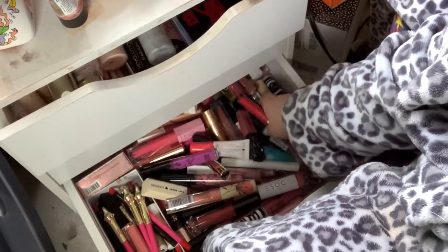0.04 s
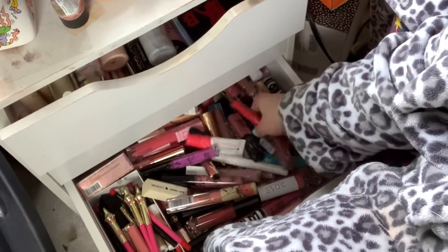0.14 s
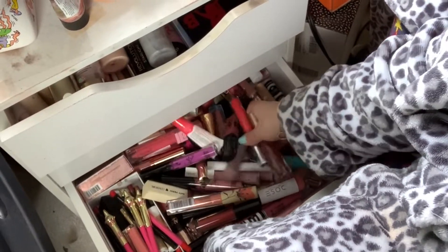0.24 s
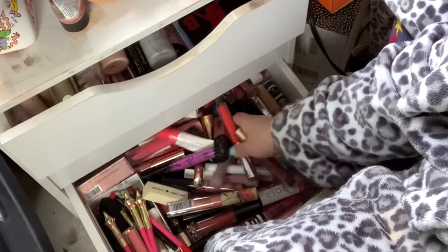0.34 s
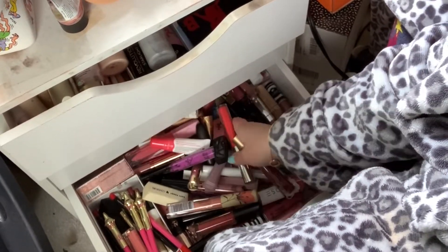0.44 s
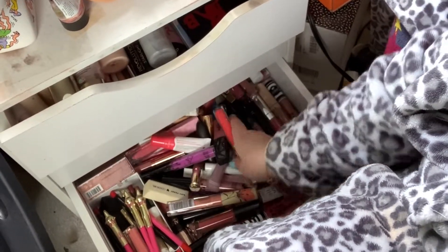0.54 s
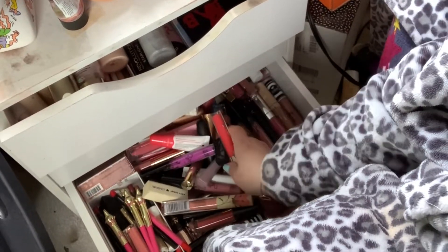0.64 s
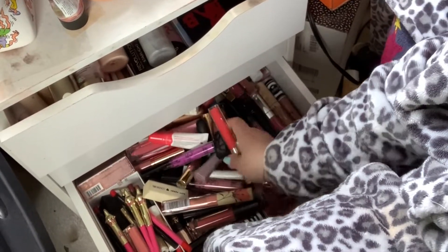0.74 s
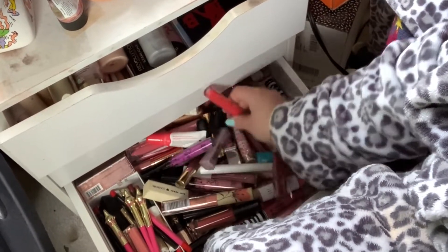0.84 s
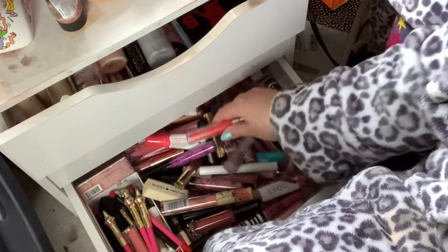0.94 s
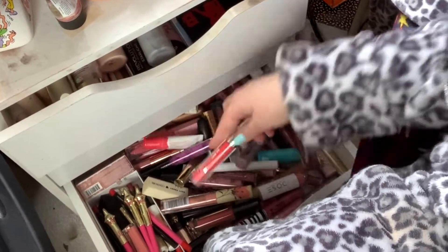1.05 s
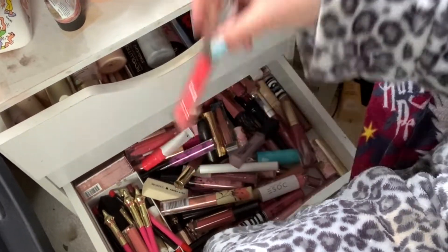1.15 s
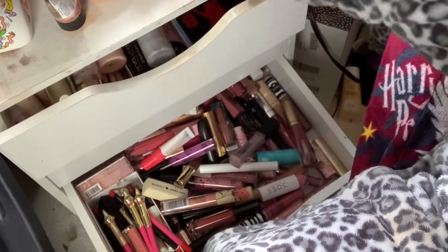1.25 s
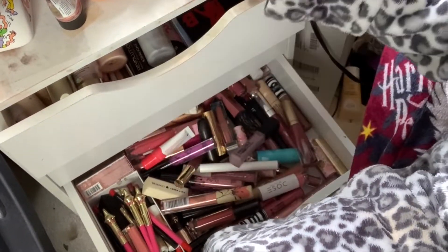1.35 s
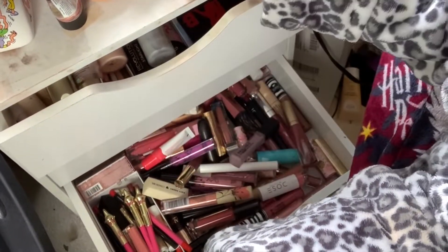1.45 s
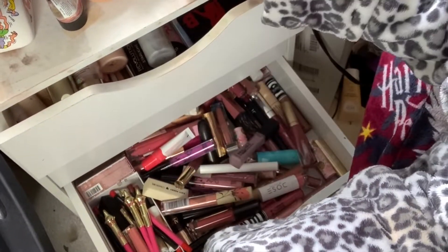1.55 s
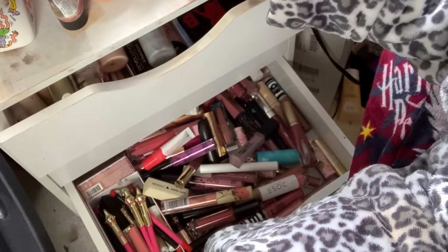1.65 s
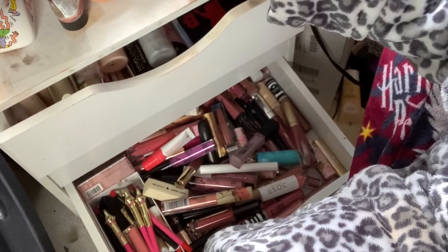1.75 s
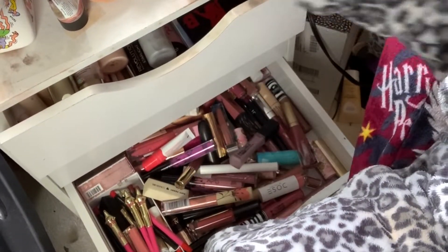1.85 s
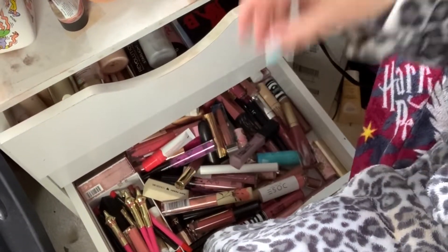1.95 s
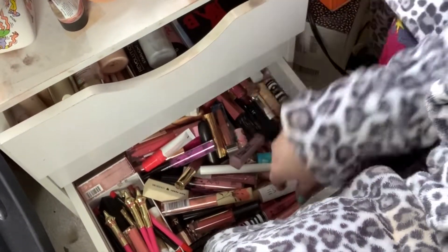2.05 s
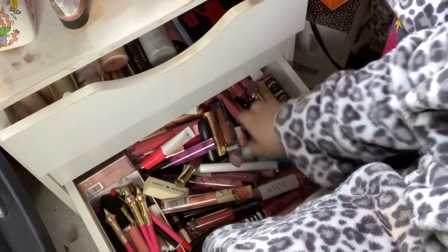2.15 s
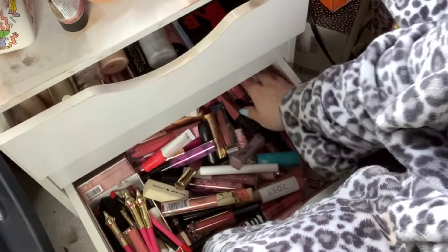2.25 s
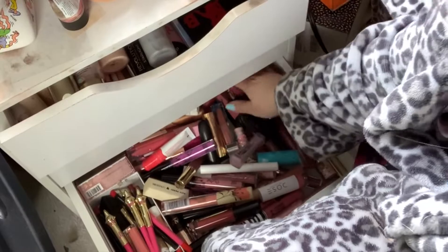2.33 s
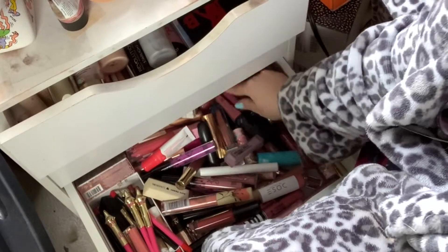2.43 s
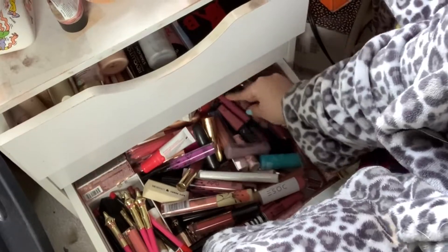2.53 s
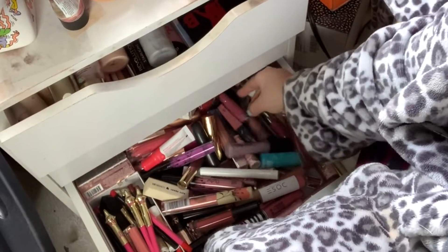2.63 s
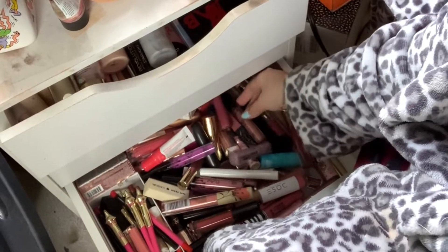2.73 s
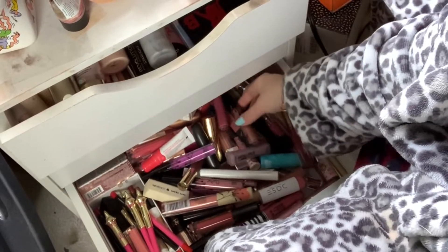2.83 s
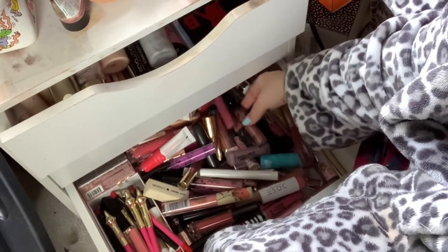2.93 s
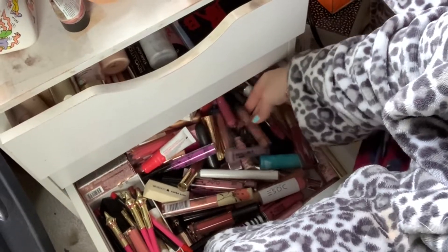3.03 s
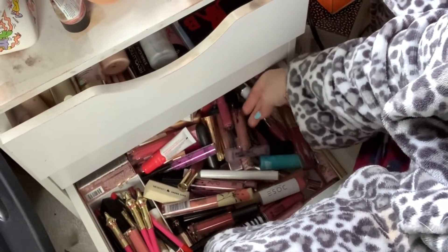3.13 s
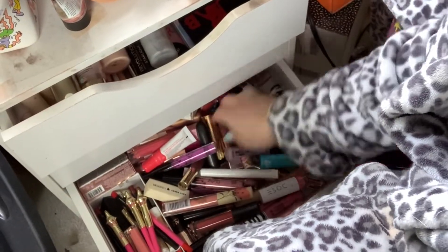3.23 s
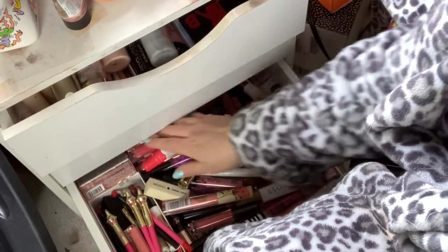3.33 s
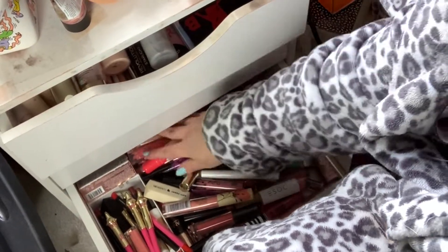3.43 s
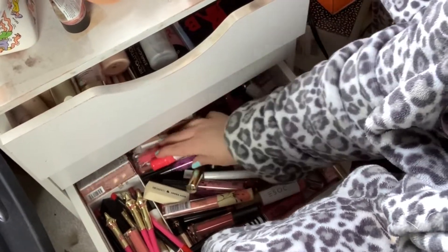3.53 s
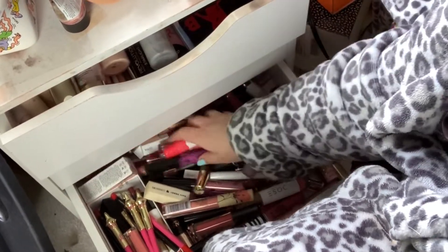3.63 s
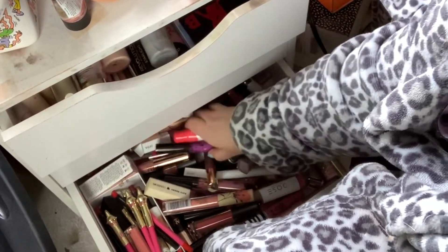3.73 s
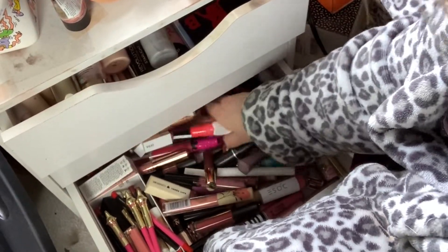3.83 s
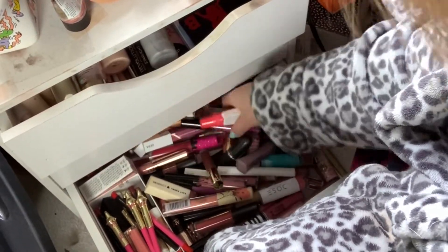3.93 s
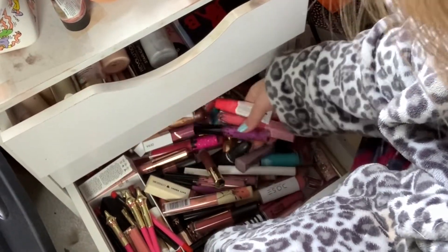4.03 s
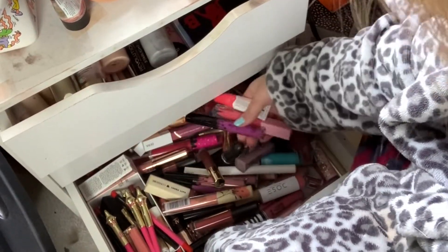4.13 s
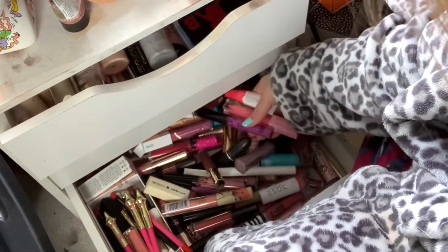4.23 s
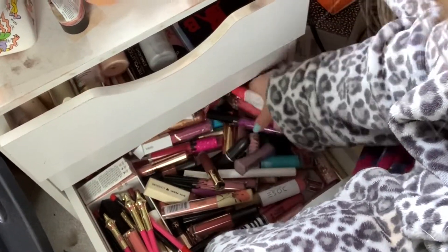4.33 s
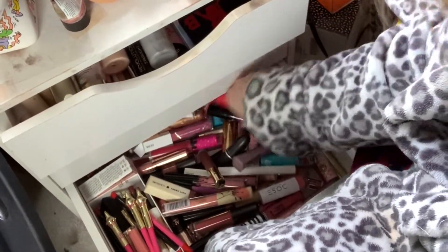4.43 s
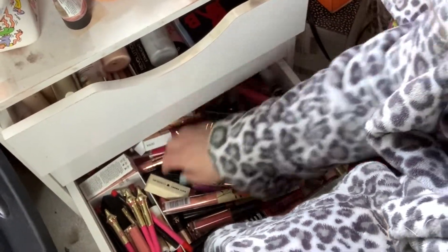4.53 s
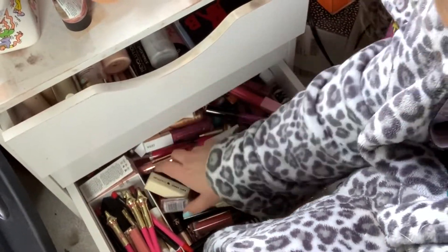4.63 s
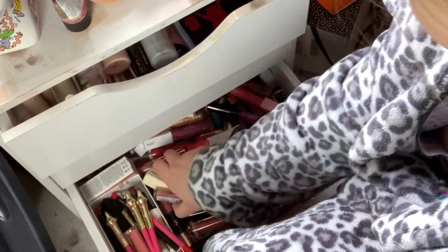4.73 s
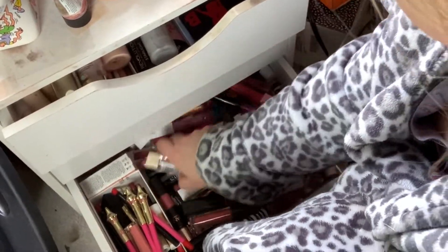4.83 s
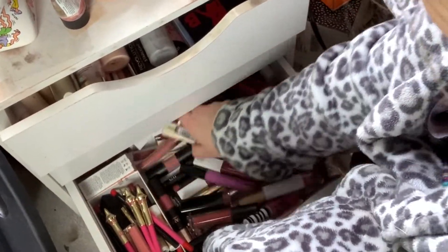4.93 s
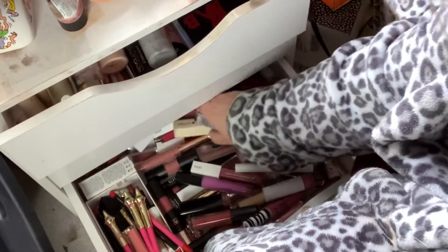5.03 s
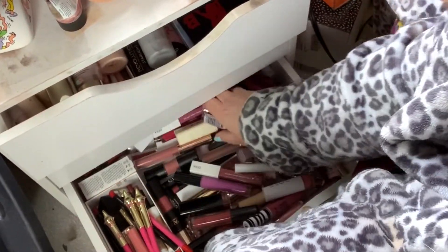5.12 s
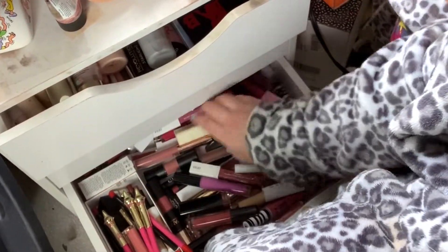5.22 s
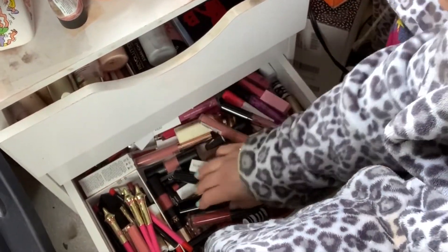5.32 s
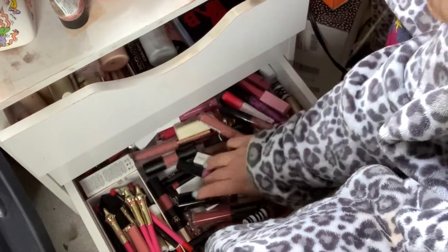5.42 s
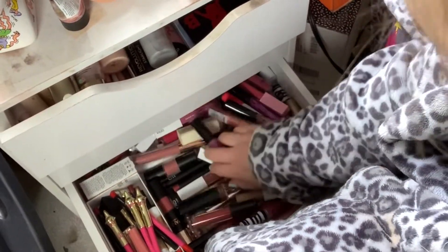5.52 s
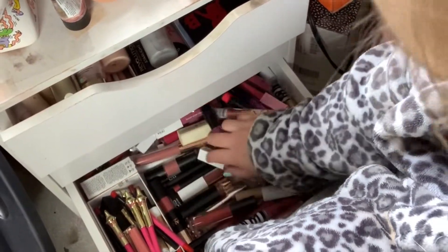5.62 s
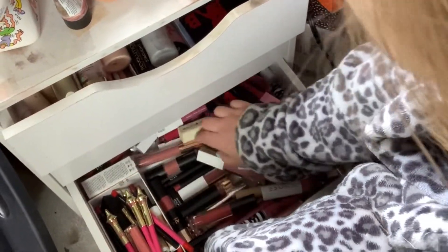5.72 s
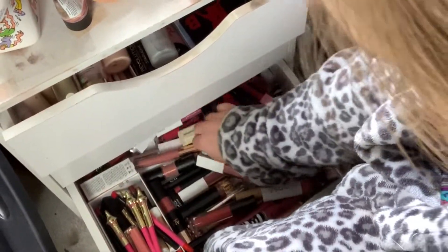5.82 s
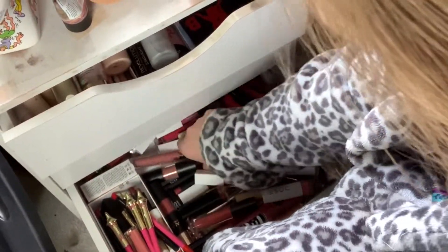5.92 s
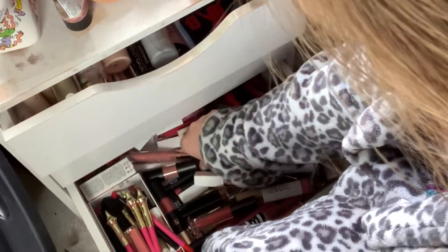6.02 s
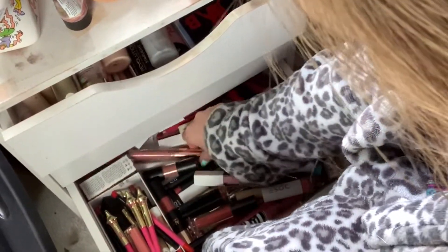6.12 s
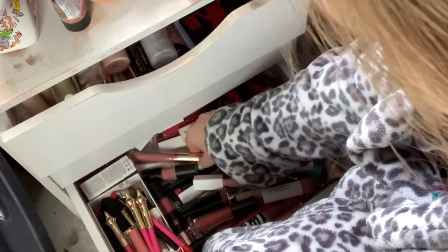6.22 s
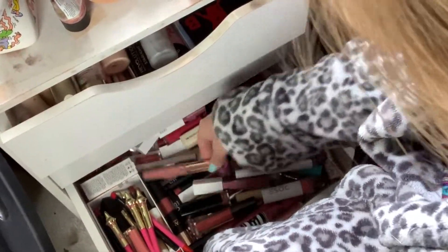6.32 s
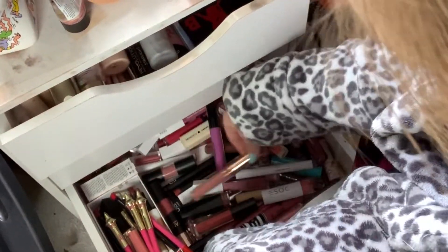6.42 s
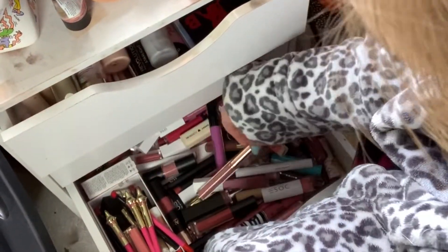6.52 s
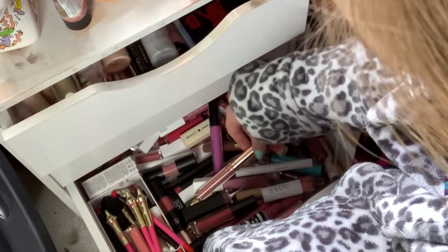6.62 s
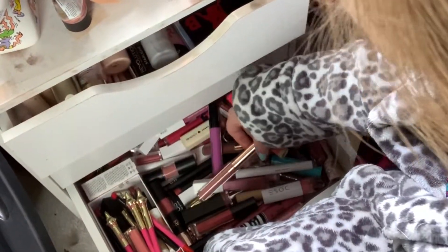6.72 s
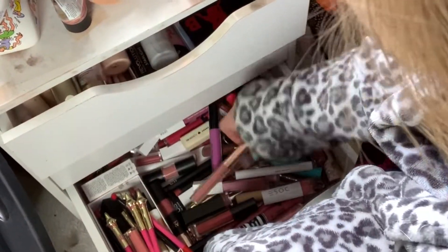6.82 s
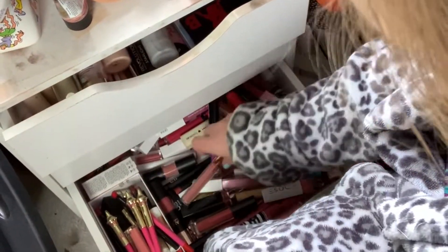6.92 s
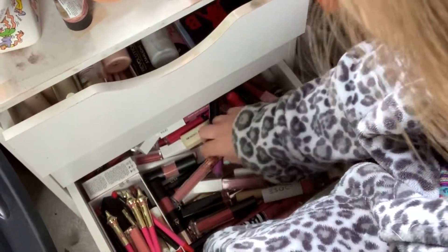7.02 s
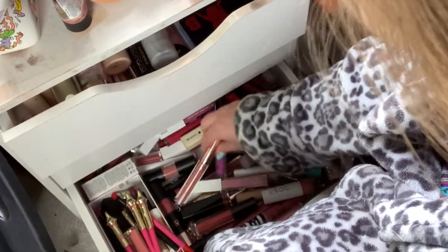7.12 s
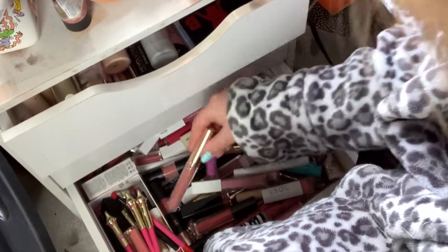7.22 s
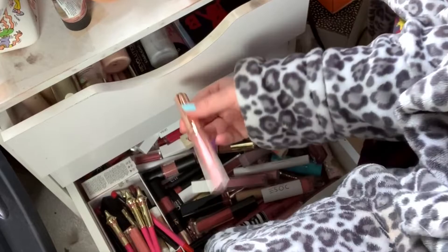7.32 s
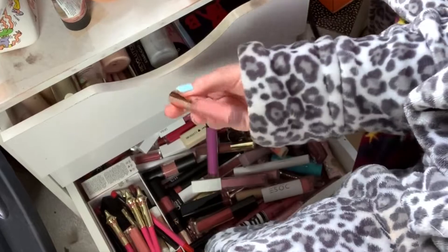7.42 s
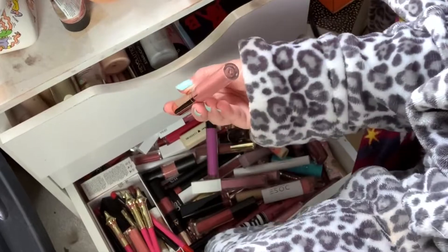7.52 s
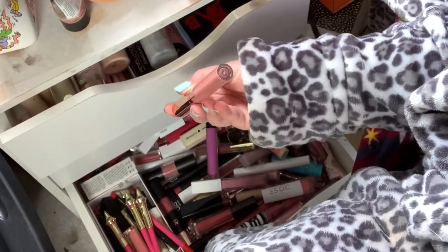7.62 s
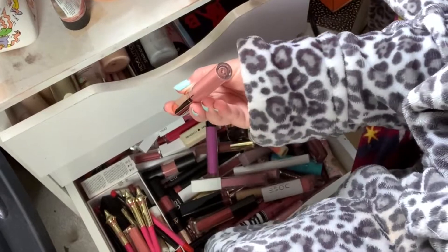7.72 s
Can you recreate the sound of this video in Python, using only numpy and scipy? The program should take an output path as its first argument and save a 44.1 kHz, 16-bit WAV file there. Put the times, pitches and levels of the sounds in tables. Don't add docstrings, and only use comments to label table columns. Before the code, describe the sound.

Many light plastic tubes and caps knock together in a shallow drawer, with bright ticks, short rings and a boxy wooden resonance. The rummaging rushes, pauses after about a second, restarts, and grows densest in the middle. A tiny faint squeak and soft fleece sleeve brushes are barely noticeable. Close stereo pickup, short indoor reflections, quiet room tone with low drawer rumble.

```python
import sys
import numpy as np
from scipy import signal
from scipy.fft import rfft, irfft, next_fast_len
from scipy.io import wavfile
from scipy.ndimage import uniform_filter1d, map_coordinates

SR = 44100
rng = np.random.default_rng(int(sys.argv[2]) if len(sys.argv) > 2 else 0)


def boost(x):
    u = np.asarray(x, float) / 20
    return 10 ** u


def dump(signal):
    limited = np.clip(np.atleast_2d(signal).T, -1, 1)
    pcm = np.round(limited * 32767).astype(np.int16)
    wavfile.write(sys.argv[1], SR, pcm)


N = 342216

# (time [s], shuffle level [dB], frame rumble level [dB])
STIR = [(0.0, -49.5, -70), (0.65, -70.5, -79), (0.99, -33, -67), (1.25, -100.5, -85), (2.27, -65.5, -76.5),
        (2.57, -43.5, -63.5), (2.77, -58, -59), (3.48, -60.5, -86), (3.72, -45, -72), (4.15, -67, -81),
        (4.3, -57.5, -63.5), (4.93, -53, -77.5), (5.79, -50.5, -74), (6.58, -64.5, -84.5),
        (6.72, -59.5, -78), (6.79, -86, -88.5), (7.05, -57, -77), (7.76, -106, -93)]
# (frequency [Hz], width [Hz], level [dB])
HOLLOW = [(1158, 120, -11), (1337, 130, -0.5), (1518, 190, -7.5), (1740, 300, -8.5)]
# (frequency [Hz], likeness [0-1])
ALIKE = [(60, 0.39), (150, 0.91), (700, 0.81), (1400, 1), (15000, 1)]


def unit(x):
    return x / np.sqrt(np.mean(x ** 2, -1, keepdims=True) + 1e-20)


def along(points, hz):
    f, v = np.transpose(points)
    return np.interp(np.log(hz + 1), np.log(f + 1), v)


def curves(rows):
    s, *cols = np.transpose(rows)
    return [np.interp(np.arange(N) / SR, s, c) for c in cols]


def wobble(rate):
    knots = rng.standard_normal(int(N * rate / SR) + 4)
    return map_coordinates(knots, [np.arange(N) * rate / SR])


def causal(gain):
    c = irfft(np.log(gain + 1e-6))
    half = len(c) // 2 - 1
    fold = np.r_[1, np.full(half, 2.), 1, np.zeros(half)]
    return np.exp(rfft(c * fold))


def mode(f, hz, width):
    return 1j * f * width / (hz * hz - f * f + 1j * f * width + 1e-9)


def body(modes, f, count, detune, scatter_db):
    draw = rng.standard_normal((count, len(modes), 2))
    total = 0
    for k, (hz, width, db) in enumerate(modes):
        gain = (-1) ** k * boost(db + scatter_db * draw[:, k, :1])
        total = total + gain * mode(f, hz * (1 + detune * draw[:, k, 1:]), width)
    return total


def peak_one(z):
    return z / np.abs(irfft(z)).max(-1, keepdims=True)


def spread(a, b, f, alike):
    u = np.arccos(np.clip(along(alike, f), -1, 1)) / 2
    shared, differing = np.cos(u) * a, np.sin(u) * b
    return np.array([shared + differing, shared - differing])


def tails(decay, count, size):
    hz, t, z = signal.stft(rng.standard_normal((count, size)), SR, nperseg=256)
    fade = boost(-60 * t / along(decay, hz)[:, None])
    x = signal.istft(z * fade, SR, nperseg=256)[1][:, :size]
    return x / np.linalg.norm(x, axis=1, keepdims=True)


def hiss(spectrum):
    m = next_fast_len(N)
    f = np.fft.rfftfreq(m, 1 / SR)
    a, b = rfft(rng.standard_normal((2, m))) * boost(along(spectrum, f))
    return unit(irfft(spread(a, b, f, ALIKE), m)[:, :N])


def background():
    # (frequency [Hz], density [dB per Hz])
    air = [(25, -62.5), (105, -5.5), (161, -13.5), (240, -15), (980, -21.5), (1300, -32.5), (9000, -40.5),
           (13000, -39), (16500, -55)]
    # (frequency [Hz], density [dB per Hz])
    frame = [(25, -42.5), (95, 7), (170, -9), (300, -69)]
    hum_hz, hum_db, air_db = 445, -90, -76
    rumble = boost(curves(STIR)[1] + 2.1 * wobble(9.5)) * hiss(frame)
    hum = boost(hum_db + 3.8 * wobble(14)) * np.sin(2 * np.pi * hum_hz * np.arange(N) / SR)
    return hum + rumble + boost(air_db + 0.75 * wobble(5.3)) * hiss(air)


def sleeve():
    # (middle [s], half length [s], level [dB], centre [Hz])
    swishes = [
        (0, 0.025, -61.5, 1500),
        (2.003, 0.31, -74, 520),
        (3.393, 0.087, -69, 6510),
        (7.7, 0.0793, -92, 2200),
    ]
    t = np.arange(N) / SR
    total = 0
    for s, half_s, db, hz in swishes:
        swell_db = db - 4.9 * ((t - s) / half_s) ** 4 + 2.5 * wobble(40)
        cloth = hiss([(hz / 3, -20), (hz / 1.7, 0), (hz * 1.6, -2), (hz * 2.6, -45)])
        total = total + boost(swell_db) * cloth
    return total


def clacks(rows, rattle_s, wall_db, size, own=None):
    # (frequency [Hz], width [Hz], level [dB])
    box = [(517.2, 80, -10), (699.7, 97.3, 1), (912.6, 150, -8)]
    # (frequency [Hz], width [Hz], level [dB])
    shell_modes = [(2410, 540, 0), (2840, 250, 1), (3360, 160, 0), (4134, 1650, -2), (4640, 580, -12)]
    # (frequency [Hz], width [Hz], level [dB])
    panel_modes = [(245, 32, -2), (350, 30, -8.5)]
    # (frequency [Hz], width [Hz], level [dB])
    cap = [(4200, 300, 0), (5500, 350, 0), (7000, 450, -2), (8800, 550, -4), (11000, 700, -4)]
    # (frequency [Hz], level [dB])
    edge = [(3000, -26.5), (5500, -1.5), (8000, -1.5), (13000, -7), (14500, -11.5), (16000, -14.5),
            (17000, -57.5)]
    # (frequency [Hz], likeness [0-1])
    apart = [(100, 0.99), (800, 0.99), (1150, 0), (2500, 0.3), (6000, 0.5), (12000, 0.2)]
    # (frequency [Hz], t60 [s])
    walls = [(200, 0.26), (700, 0.093), (2000, 0.12), (4000, 0.13), (9000, 0.13)]
    s, db, boom_db, shell_db, tick_db = np.transpose(rows)[:, :, None]
    f, t, n = np.fft.rfftfreq(size, 1 / SR), np.arange(512) / SR, len(rows)

    touch = 200
    late = t - touch / SR
    lead_swell = t * SR / touch * boost(-5 + 60 * late / 0.025)
    swell = np.where(late > 0, boost(-60 * late / rattle_s), lead_swell)
    push = np.exp(-2j * np.pi * f * touch / SR)
    chatter = rfft(rng.standard_normal((n, 512)) ** 3 * swell, size)

    no_bass = mode(f, 470, 3300) ** 2
    if own:
        hollow = own(f, n)
    else:
        hollow = body(HOLLOW, f, n, detune=0.042, scatter_db=4.5) * no_bass
    boom = body(box, f, n, detune=0.018, scatter_db=5.5) * no_bass
    shell = body(shell_modes, f, n, detune=0.068, scatter_db=2.5) * mode(f, 2700, 3800)
    tick = causal(boost(along(edge, f))) * (1.1 + body(cap, f, n, detune=0.15, scatter_db=4))
    hollow = boost(db) * peak_one(hollow * (push + 0.0087 * chatter))
    boom = boost(db + boom_db) * peak_one(boom * (push + 0.0098 * chatter))
    shell = boost(db + shell_db) * peak_one(shell * (push + 0.051 * chatter))
    tick = boost(db + tick_db - 0.7) * peak_one(tick * (push + 0.068 * chatter))
    tube = hollow + shell + tick

    panel = sum(boost(g) * mode(f, hz, width) for hz, width, g in panel_modes)
    panel = panel * mode(f, 310, 430) + boost(-25.0) * mode(f, 120, 92)
    thump = boost(0.7 * (db + boom_db) - 28.5) * peak_one(panel)

    edge_wave = rng.standard_normal((n, 128)) * boost(-60 * t[:128] / .002)
    near = spread(0.73, .6j * unit(rfft(edge_wave, size).real), f, apart)

    pool = rfft(np.pad(tails(walls, count=40, size=size - 900), ((0, 0), (170, 0))), size)
    a, b = pool[rng.integers(0, len(pool), (n, 2)).T]
    blurred = np.sqrt(uniform_filter1d(np.abs(tube) ** 2, size // 75))
    scattered = (blurred + boost(-4.5) * boom + thump) * spread(a, b, f, ALIKE)
    waves = irfft((tube + boom + thump) * near + boost(wall_db) * scattered, size)

    lead_in = 256
    waves = np.roll(waves, lead_in, axis=2)
    at = (np.round(s * SR).astype(int) - lead_in - touch + np.arange(size)).clip(0).ravel()
    return np.array([np.bincount(at, w.ravel(), N + size)[:N] for w in waves])


def contacts():
    # (time [s], hollow peak [dB], boom [dB], shell [dB], tick [dB])
    rummage = [(0.0238, -49, 7, 4, -19), (0.0579, -38.5, -6.5, 2.5, -8), (0.0667, -42.5, 0, 6, 6.5),
               (0.1128, -22, -13, -1, -16.5), (0.2016, -47, 9.5, 4, 1.5), (0.2207, -35, -5, -3, -18.5),
               (0.2554, -30, 1, -5.5, -9.5), (0.2838, -52, 2, 0.5, -6.5), (0.3057, -35, -5, -5, -5),
               (0.3137, -17.5, -1, -0.5, -7), (0.3611, -38, -8, 8, -11), (0.3911, -32.5, -2, 2, -2.5),
               (0.4003, -34.5, 4.5, 2.5, -3.5), (0.4245, -30.5, -24.5, -2, -30),
               (0.4384, -36.5, -4, -2.5, -20.5), (0.5136, -47.5, -2.5, 1.5, -24),
               (0.5703, -44, -4, -10, -21.5), (0.5786, -50.5, -2.5, 8, -1), (0.5986, -25, -15, 3.5, -12.5),
               (0.6237, -32.5, -11.5, -1, -2.5), (0.6342, -31, -12.5, -3, 16.5), (0.712, -36.5, -8.5, 2, -6),
               (0.7355, -37.5, -1, 1, -13), (0.7415, -38.5, -2.5, 5.5, 5.5), (0.7874, -41, -10.5, -5, -19),
               (0.8023, -33, -6.5, 4.5, -15), (0.8349, -36, 5, 5, -4.5), (0.8422, -25.5, -1.5, -1.5, -15.5),
               (0.8958, -33.5, -2.5, 0.5, -14), (0.9037, -26, 9, 4, -14), (0.9216, -18, 0, -3, -16.5),
               (0.9352, -21, -15, -4.5, -16.5), (0.9508, -22, -3.5, -2.5, -12.5),
               (0.9653, -25.5, 5.5, 0.5, -14), (0.988, -27.5, 2, 2.5, -14),
               (1.0225, -16.5, -1.5, -0.5, -16.5),
               (1.0534, -26, -5, 0.5, -14), (1.0813, -25, -7, -4, -10.5), (1.1386, -35, -3, -10.5, -27),
                  (1.1715, -45.5, 9, 2.5, -1), (1.1867, -46, 6, -2.5, -2), (2.268, -54, 12, -3, -29),
                  (2.4135, -30.5, -2, -5, -14.5), (2.4309, -40.5, 8, 4, -11),
                  (2.4579, -21, -12, -4.5, -19.5), (2.4716, -25.5, 1, 3, -3.5),
                  (2.4949, -24.5, -11, -1, -17), (2.5065, -24.5, -5.5, 0, -5), (2.5466, -34, 1, -2, -1),
                  (2.5535, -21, -1, -7.5, -24.5), (2.5929, -37.5, -18, 3.5, -13.5),
                  (2.6144, -40, 1, -6.5, -3), (2.6249, -32.5, -2, -3, -12), (2.6721, -23, -11, -3.5, -9.5),
                  (2.6792, -31, -6, -5.5, -11.5), (2.685, -27.5, -4, 4, 0.5), (2.6939, -25, 4, -6, -21),
                  (2.7151, -35, 2, 4.5, -5), (2.7215, -34.5, 8.5, -3, -21.5), (2.7681, -19, 3, -2, -10),
                  (2.8496, -38, -9, -1, -30), (2.8681, -37, -7, -14.5, -19), (2.9325, -47, 4, 5.5, -10),
                  (2.9604, -37.5, -5, -4.5, -27.5), (3.0087, -37.5, 4.5, -4.5, -35),
                  (3.0253, -37.5, -18, 1, -17), (3.033, -31, 1, 6, -2), (3.0845, -31, 9.5, 7, -5.5),
                  (3.1281, -27.5, 7, 1, -16.5), (3.1896, -40, 3, -0.5, -13.5),
                  (3.2549, -13.5, -5.5, 0, -10),
               (3.5211, -40, 0.5, 6.5, -5.5), (3.538, -33, -5.5, -1, 1), (3.5745, -36.5, 4, 4, -2.5),
           (3.6226, -20, 10.5, 2, 10), (3.6365, -30.5, -2.5, 0.5, 8.5), (3.641, -23, 0, 0.5, -4),
           (3.6536, -28.5, 5, 4.5, -5), (3.6776, -35.5, -7, 6, -5.5), (3.7104, -39, -7.5, 10, -5),
           (3.734, -20, -1.5, 4.5, -14), (3.7914, -38, 3.5, 7, -3.5), (3.8139, -28, -9, -7, -18),
           (3.8233, -43.5, 3, 7, 8), (3.857, -26.5, 6, 0.5, 0), (3.8678, -20, -1.5, -5.5, -16.5),
           (3.885, -27, 4.5, 3.5, -6.5), (3.9806, -19, -5.5, 0.5, -11), (4.0377, -57.5, 0, 11.5, 14.5),
           (4.0502, -46, 8.5, 12, 3), (4.1339, -47, -12, 6.5, -1), (4.2537, -38.5, -5, -4.5, -26),
           (4.2933, -40.5, -14.5, 1, -25.5), (4.3151, -33, -4, 1, 2.5), (4.3432, -33, -11, -1.5, -10),
           (4.3695, -17.5, 0, 0.5, -14.5), (4.3831, -22, -3, -0.5, -13.5), (4.493, -20.5, 7, 4, -9),
           (4.5413, -31.5, 10.5, 1, 5), (4.5739, -26, 1.5, 1.5, -0.5), (4.6, -22.5, -1, -2.5, 0),
           (4.618, -30, 3.5, 6.5, -3), (4.6506, -31, -3, -2, -7),
               (4.7788, -25, -15, -5, -7.5), (4.8295, -31.5, -18, -4, -11), (4.839, -26, -6, -9.5, -22),
            (4.868, -29.5, 0.5, 2, -5.5), (4.8787, -31, 5, 4.5, -5.5), (4.8866, -20.5, -11, -5, -11.5),
            (4.9003, -23.5, 1, -2.5, -3.5), (4.9075, -20, -2, -1, -5), (4.9404, -22, 0, -3.5, -13.5),
            (4.9691, -26.5, -12.5, -1.5, -6), (4.9984, -24.5, -3.5, 0, -2),
            (5.0457, -25.5, -3, -4.5, -10.5), (5.077, -17, 2, -5, -15.5), (5.0987, -27, -9, -3, 1),
            (5.1443, -30, 12, 12.5, 9.5), (5.2028, -18.5, -12.5, -4.5, -23), (5.2562, -37.5, -2.5, -2, -18),
            (5.3, -32, 0, -3.5, -14.5), (5.33, -50.5, -11, -2, -2.5), (5.3511, -29.5, -6, -1, -4.5),
            (5.3589, -36, -7, 7, -6.5), (5.3701, -39, -11, 3.5, -3.5), (5.3848, -29.5, -9.5, 0.5, -7.5),
            (5.4248, -28.5, -2, 4, -1), (5.4802, -34, -1, -2, -3.5), (5.4964, -28.5, -4.5, -3, -9.5),
            (5.5306, -20, 7.5, 4.5, -3.5), (5.545, -19, 4, 1.5, 1), (5.5931, -45, 6.5, 8.5, 14),
            (5.6071, -50, 11.5, 13, 16.5), (5.6142, -37, 6, 9, 1.5), (5.6348, -29.5, 1, 3.5, -8),
            (5.687, -42.5, 0.5, -12, -34), (5.7108, -24.5, 1.5, 1, -19.5), (5.7379, -31, 1, -7.5, -7.5),
               (5.7527, -32.5, 3, 2, -6), (5.788, -30, -3, -4, -9), (5.8185, -46, 8.5, 13, 6),
            (5.8371, -35, -3.5, -2.5, -22), (5.844, -40, -1, 7, 2.5), (5.8647, -27, -5.5, -0.5, -5.5),
            (5.8717, -35, -6, 4.5, 10), (5.8832, -30, -17, -9.5, -13), (5.9006, -31, 0, 2.5, 0),
            (6.0289, -36, -6, -8, -21), (6.0345, -32.5, -1, -8.5, -8), (6.0421, -37, -1, 7, -1),
            (6.0533, -29.5, -3, -6.5, -18), (6.063, -29, 0, 5.5, 5.5), (6.1494, -44, 5.5, -6, -6),
            (6.1688, -25, -7, 0.5, -0.5), (6.201, -28.5, -7, -12.5, -33), (6.3, -36.5, -7.5, -4.5, -15.5),
            (6.351, -31, -2, 3, -12), (6.3911, -27, -1.5, 5.5, 2.5), (6.4089, -34.5, -8, -6, -17),
            (6.4365, -22, 11.5, 2.5, 3), (6.465, -29.5, -3.5, 1.5, 6.5), (6.6607, -44, -3, 7, -10),
            (6.878, -28, -0.5, -2, -1), (6.894, -36, -13.5, 3.5, 1), (6.9025, -34, -20, 6, -2.5),
            (6.9366, -23, -6, -1.5, -10.5), (6.9483, -33.5, -16, -2, -9), (7.0345, -47, -1, -1, -21),
            (7.0609, -38, -6, 1.5, -18), (7.079, -39.5, -2.5, -1, -24), (7.195, -35.5, -7.5, 3, -8),
            (7.2137, -27, 0, 1.5, -12),
               (3.2595, -16, 6, -1.5, -4),
    ]
    # (time [s], hollow peak [dB])
    clicks = [(0.6448, -28), (0.6599, -28), (1.066, -23.5), (2.4449, -29.5), (3.904, -22), (5.4159, -29),
              (3.5057, -33), (4.9802, -27.5), (3.911, -20.5), (6.3218, -27.5), (1.1082, -29.5),
              (2.3688, -30), (0.1603, -32.5), (0.2917, -34.5), (3.2795, -25.5), (3.469, -43.5),
              (4.6651, -30), (5.0343, -26.5), (5.9622, -35.5), (6.3978, -26.5), (2.3222, -58), (3.609, -27),
              (4.5356, -25.5), (4.7753, -31), (4.9361, -25.5), (6.388, -31), (6.6181, -54), (6.733, -57.5),
              (6.8448, -55.5), (7.1124, -46.5), (7.153, -53)]
    # (boom [dB], shell [dB], tick [dB])
    click_colour = (-2.9, 0.84, -7)
    # (time [s], hollow peak [dB], boom [dB], shell [dB], tick [dB])
    trim = (0, 3, 0.5, 0.93, 2.5)
    light = [tuple(row) + tuple(click_colour) for row in clicks]
    return np.r_[rummage + light] + trim


def shuffle(heard):
    count = 950
    s = (np.arange(count) + rng.random(count)) * N / SR / count
    draw = rng.standard_normal((count, 4)).clip(-2, 1.7)
    knock_s, knock_db = heard.T[:2]
    since = s[:, None] - knock_s
    fading_db = knock_db - 60 * np.abs(since) / 0.19
    after = np.where(since > 0, fading_db, -200).max(1)
    before = np.where(since <= 0, fading_db, -200).max(1)
    jostle_db = np.minimum(after, before) - 9.5
    stir_db = curves(STIR)[0][(s * SR).astype(int)]
    db = np.maximum(jostle_db, stir_db) + 3.2 * draw[:, 0]
    soft_db = 1.7 * np.minimum(db + 56.5, 0)
    boom_db = 1.5 - .4 * soft_db + 3 * draw[:, 1]
    shell_db = -1.5 + soft_db + 3 * draw[:, 2]
    tick_db = -9.5 + soft_db + 4 * draw[:, 3]
    rows = np.c_[s, db + .3 * soft_db, boom_db, shell_db, tick_db]

    def small_tubes(f, count):
        return body(HOLLOW, f, count, detune=0.12, scatter_db=5) * mode(f, 1400, 2000)

    return clacks(rows, rattle_s=0.018, wall_db=1.5, size=3072, own=small_tubes)


def rings():
    # (time [s], peak [dB], pitch [Hz])
    notes_rung = [(0.3138, -20.5, 2350.0), (0.3907, -34.5, 2670.0), (0.634, -37.5, 7000),
                  (0.8028, -30, 3400.0), (0.9043, -24.5, 3790.0), (0.9204, -27, 4170), (0.9646, -28, 2740),
                  (1.1698, -36.5, 2520.0), (2.5059, -30.5, 2280), (2.5518, -27, 3980),
                  (2.6723, -29.5, 4050), (2.6848, -26.5, 4200), (2.6941, -32, 2840.0),
                  (2.7224, -40, 4050.0), (2.7659, -24.5, 3470.0), (3.2548, -16.5, 3520), (3.623, -18, 2650),
                  (3.6786, -33, 5540), (3.734, -22, 2430), (3.824, -41, 8680.0), (3.886, -31, 2620),
                  (3.9818, -24, 2450), (4.3435, -33.5, 2600), (4.3688, -23, 3010.0), (4.3821, -29, 2640),
                  (4.494, -23.5, 2680), (5.077, -21.5, 4230), (5.1444, -23, 2840.0), (5.4251, -27.5, 2630),
                  (5.5309, -18.5, 4000), (5.5453, -18.5, 2820), (5.607, -40.5, 6460.0),
                  (5.9024, -21.5, 5560), (6.1708, -24.5, 4400), (6.437, -16.5, 3360.0),
                  (6.9381, -29.5, 4700), (1.4646, -43.5, 3500), (2.3648, -28.5, 893), (2.4599, -28, 915),
                  (2.5535, -23.5, 866), (3.9043, -23, 900), (4.1355, -50, 931), (4.316, -35, 899),
                  (4.9075, -29, 845)]
    rows = [(s, db + 6, -40, -40, -40) for s, db, hz in notes_rung]
    hz = np.array(notes_rung)[:, 2:]
    width_hz = 0.083 * hz

    def cap_note(f, count):
        return mode(f, hz, width_hz) * mode(f, hz, hz)

    return clacks(rows, rattle_s=0.006, wall_db=-13.5, size=4096, own=cap_note)


def loose(f, count):
    # (frequency [Hz], width [Hz], level [dB])
    lone = [(903, 180, -1.5), (1484, 100, 0), (2150, 110, -2.5), (2800, 130, -8.5), (3370, 140, -7),
            (4700, 220, -14.5), (6190, 250, -16.5)]
    return body(lone, f, count, detune=0.006, scatter_db=.8)


def topple():
    # (time [s], peak [dB], then re peak: boom [dB], shell [dB], tick [dB])
    fall = [
        (1.4778, -12.5, -22.5, -8.5, -18),
    ]
    return clacks(fall, rattle_s=0.0064, wall_db=-6.5, size=7200, own=loose)


def settling():
    # (time [s], hollow peak [dB], boom [dB])
    settle = [
        (1.7147, -50, -9),
        (1.7895, -46, -12),
        (1.9307, -46, -12),
        (1.9968, -51, -6),
        (7.3764, -64, 4),
    ]
    shell_db, tick_db, muffle_hz = -20, -43, 1720
    rows = [(s, db, boom_db, shell_db, tick_db) for s, db, boom_db in settle]
    taps = clacks(rows, rattle_s=0.02, wall_db=-8, size=4096, own=loose)
    return signal.sosfilt(signal.butter(4, muffle_hz, fs=SR, output="sos"), taps)


def squeak():
    start_s, length_s, rise_s, level_db = 4.163, 0.18, 0.045, -54.5
    top_hz, glide_hz, glide_s = 1600, 210, .055
    slips_per_s, slip_db = 34.5, 5
    t = np.arange(N) / SR - start_s
    hz = top_hz - glide_hz * np.exp(-t.clip(0) / glide_s)
    swell = (t / rise_s).clip(0, 1) ** 1.43 * ((length_s - t) / 0.014).clip(0, 1)
    pulse_db = slip_db * np.cos(2 * np.pi * slips_per_s * (t - rise_s))
    db = level_db + pulse_db - 12 * t + 2.5 * wobble(70)
    turn = 2 * np.pi * np.cumsum(hz * (1 + 0.0028 * wobble(120))) / SR
    return np.sqrt(2) * swell * boost(db) * (np.sin(turn) + boost(-32) * np.sin(2 * turn))


def room(tubes):
    # (frequency [Hz], t60 [s])
    room_decay = [(200, 0.098), (1500, 0.26), (8000, 0.096)]
    echo = np.pad(tails(room_decay, count=2, size=20000), ((0, 0), (500, 0)))
    return boost(-20.5) * signal.fftconvolve(tubes, echo, axes=1)[:, :N]


def scene():
    rows = contacts()
    knocks = clacks(rows, rattle_s=0.011, wall_db=-5.5, size=7200)
    tubes = knocks + rings() + topple() + shuffle(rows) + settling()
    return tubes + room(tubes) + squeak() + sleeve() + background()


def roll_off(x):
    return signal.sosfilt(signal.butter(12, 16810, fs=SR, output="sos"), x)


def record(dry):
    # (frequency [Hz], left lead [rad])
    lead = [(600, 0), (1000, -.5), (1400, 0), (3000, -.7), (8300, -.6), (9600, -1.4), (12000, .8),
            (13300, 2.8)]
    # (frequency [Hz], left minus right [dB])
    left = [(60, 4), (250, 1), (600, 1.5), (1200, -3), (2200, -0.5)]
    m = next_fast_len(N + 4096)
    f = np.fft.rfftfreq(m, 1 / SR)
    half_difference = .5j * along(lead, f) + along(left, f) * np.log(10) / 40
    ports = np.exp(half_difference * [[1], [-1]]) * (f < 16500)
    mix = irfft(rfft(dry, m) * ports, m)[:, :N]
    return roll_off(mix)


dry = scene()
out = record(dry)
dump(out)
```